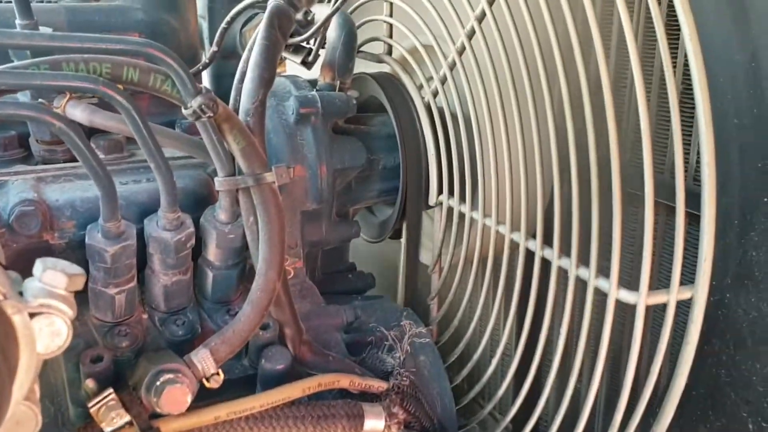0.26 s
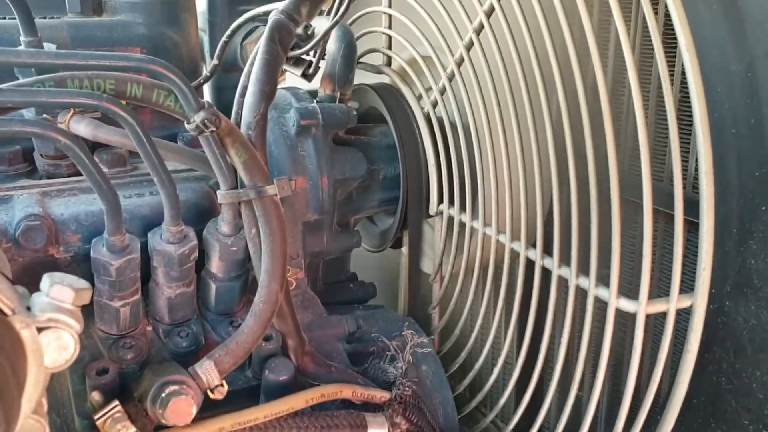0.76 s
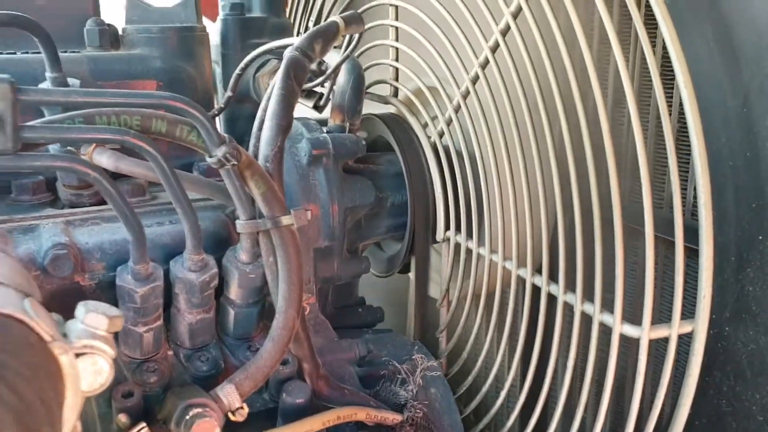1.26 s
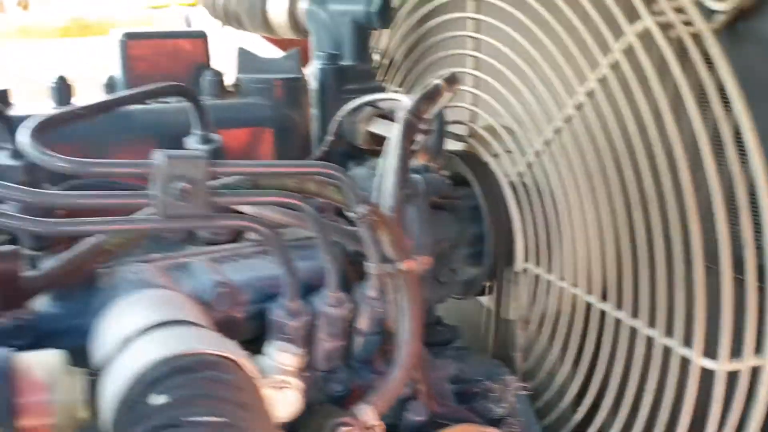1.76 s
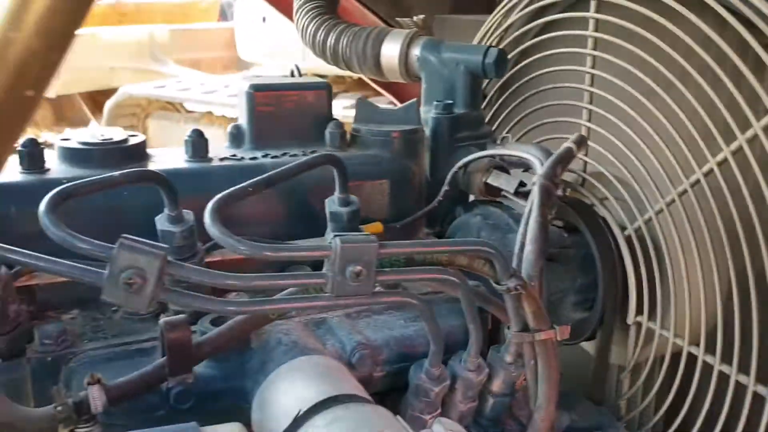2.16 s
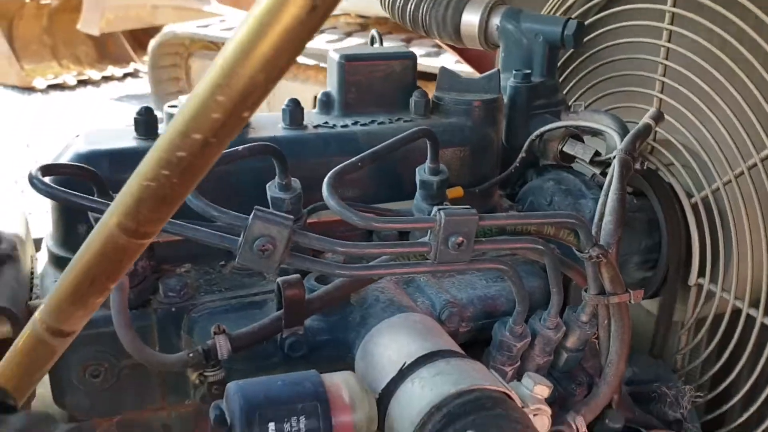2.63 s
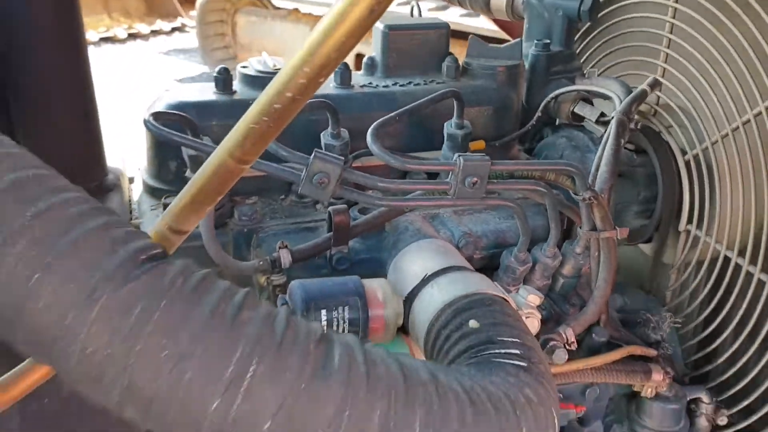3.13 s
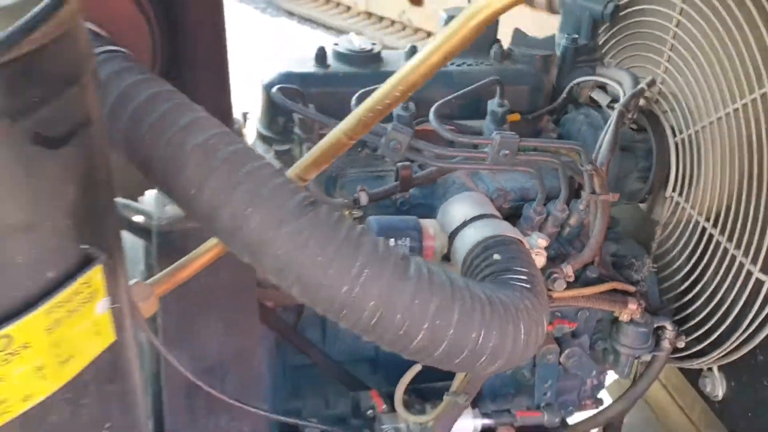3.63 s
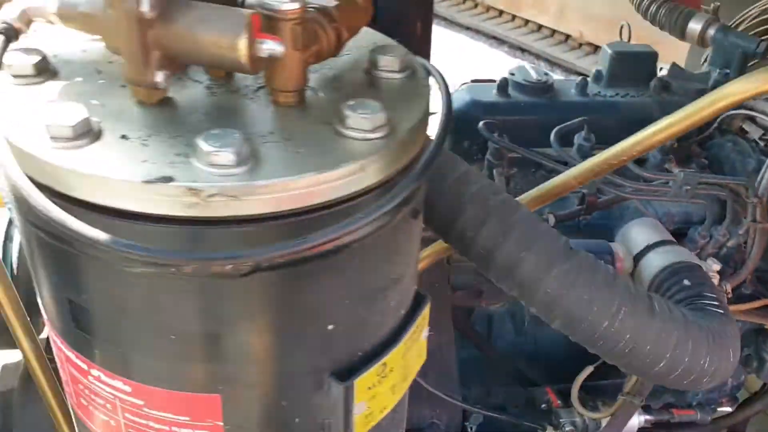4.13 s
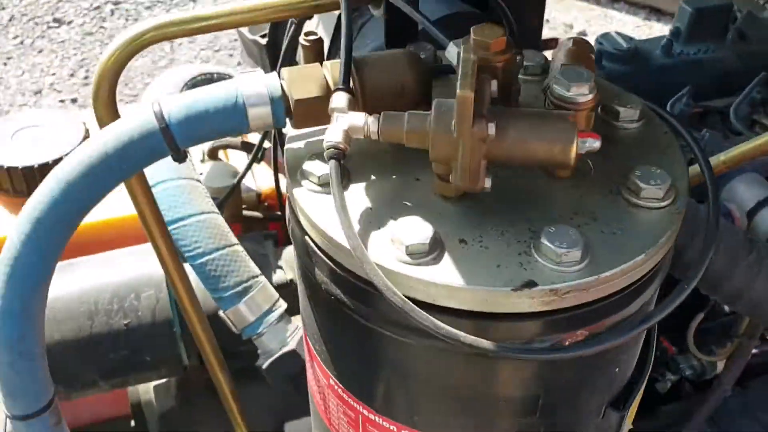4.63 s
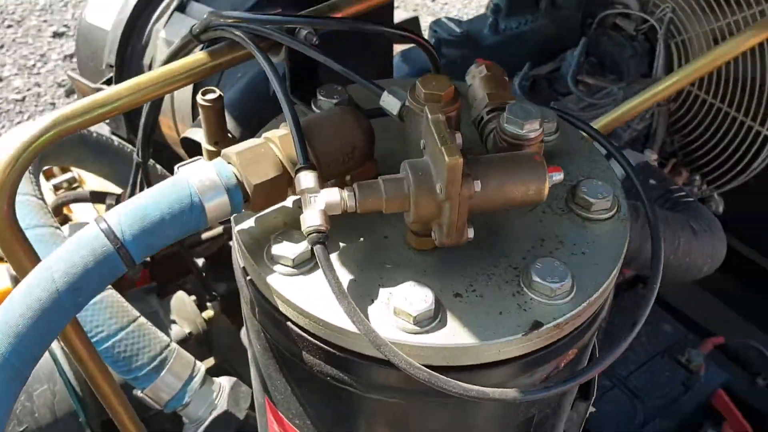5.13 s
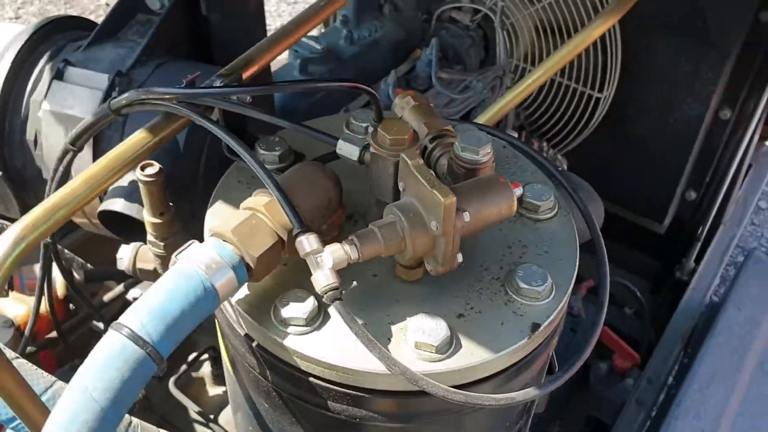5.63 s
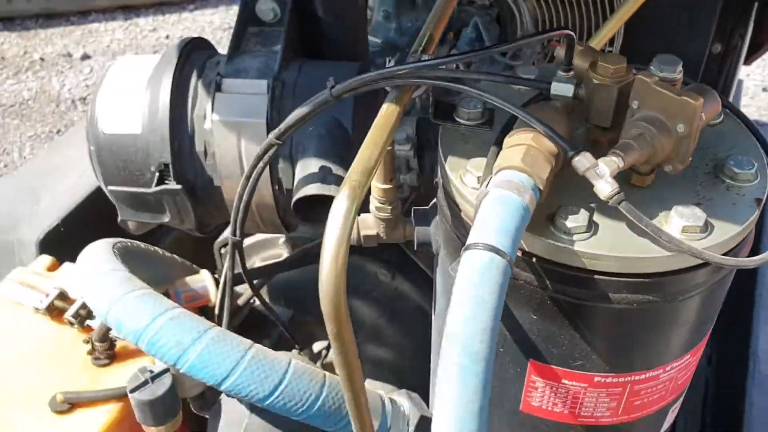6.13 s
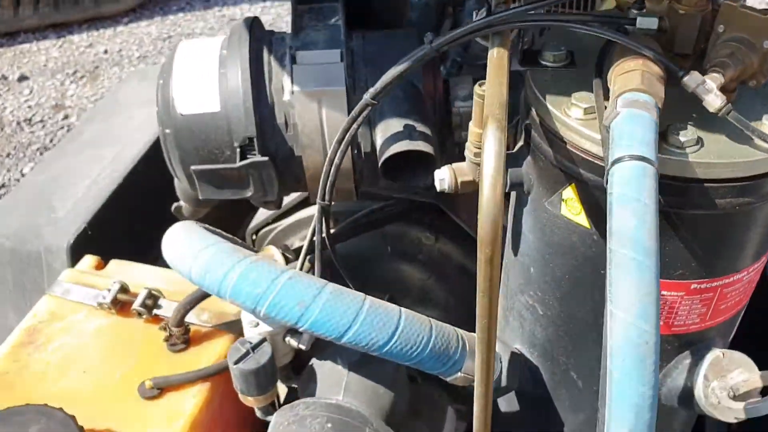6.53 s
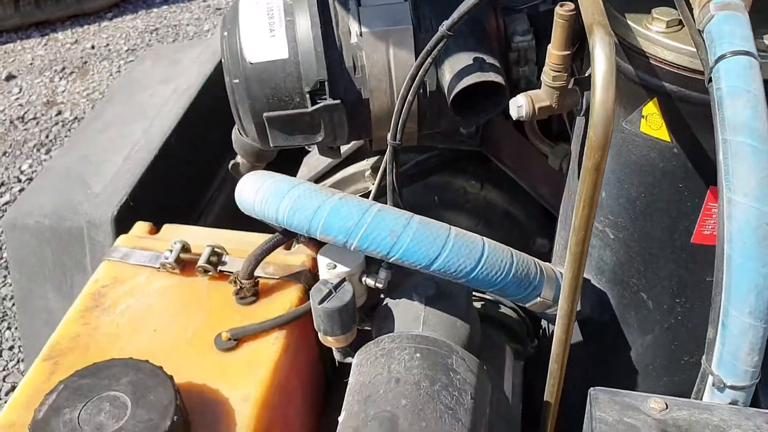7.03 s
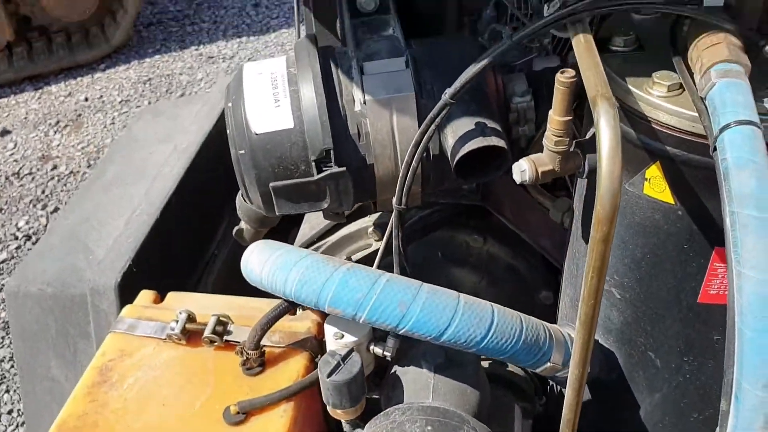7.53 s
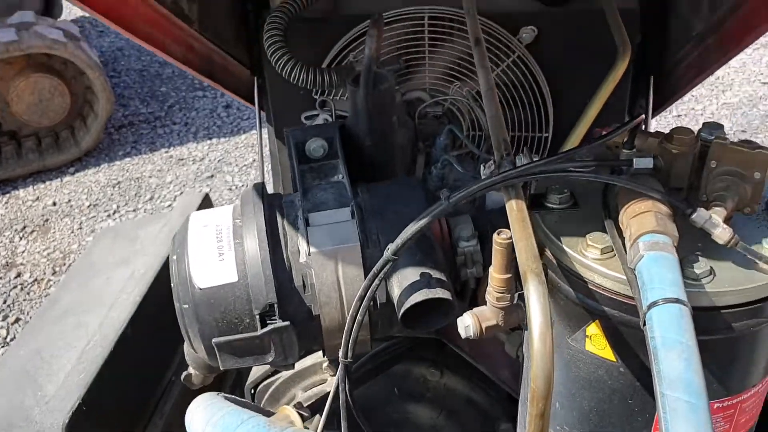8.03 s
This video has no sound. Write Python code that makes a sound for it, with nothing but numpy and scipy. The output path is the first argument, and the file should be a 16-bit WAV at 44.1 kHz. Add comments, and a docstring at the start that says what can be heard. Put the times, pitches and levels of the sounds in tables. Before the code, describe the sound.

A small diesel engine runs at steady speed with deep thumping exhaust, clatter and rushing air, dulling midway and then returning brighter.

```python
"""Portable air compressor, hood open

Three-cylinder diesel at governed speed: noise roar, repeating clatter, ringing knocks, tonal exhaust.
Belt-driven fan: phase-locked blade tones. Rushing air: two bands of shaped stereo noise.
A hand-held camera with two ports moves from the fan guard, behind the separator tank (shielded, quieter),
to the air filter; levels, port delay and colour follow it.
"""
import sys
import numpy as np
from scipy import signal
from scipy.fft import rfft, irfft, next_fast_len
from scipy.io import wavfile
from scipy.ndimage import uniform_filter1d, map_coordinates

SR = 44100
rng = np.random.default_rng(int(sys.argv[2]) if len(sys.argv) > 2 else 0)


def generate_wav(sig):
    """Save sig (samples, or channels by samples) to the path in sys.argv[1] as 16-bit PCM at SR."""
    pcm = np.round(np.clip(np.atleast_2d(sig).T, -1, 1) * 32767).astype(np.int16)
    wavfile.write(sys.argv[1], SR, pcm)


N = 365148
T = np.arange(N) / SR


def amp(db):
    """Decibels to gain."""
    return 10 ** (np.asarray(db) / 20)


def unit(x):
    """Scale to rms 1."""
    return x / np.sqrt(np.mean(x ** 2) + 1e-20)


def along(points, hz):
    """Interpolate (f/Hz, value) points on a log-frequency axis."""
    f, v = np.transpose(points)
    return np.interp(np.log(hz + 1), np.log(f + 1), v)


def curves(rows, t=T):
    """Each column after the time, read at the times t."""
    s, *cols = np.transpose(rows)
    return [np.interp(t, s, c) for c in cols]


def wobble(rate_hz):
    """Smooth random curve, rate_hz knots per second."""
    knots = rng.standard_normal(int(N * rate_hz / SR) + 4)
    return map_coordinates(knots, [T * rate_hz], order=2)


def bell(x, centre, half_width):
    """Smooth hump, 1 at the centre."""
    return np.exp(-((x - centre) / half_width) ** 2)


def filtered(x, response):
    """x times a response of frequency, by FFT."""
    m = next_fast_len(N + SR // 4)
    spectrum = rfft(x, m) * response(np.fft.rfftfreq(m, 1 / SR))
    return irfft(spectrum, m)[..., :N]


def panned(db):
    """Left and right gains of constant power for an L-R difference in dB."""
    gains = amp(np.array([db, -db]) / 2)
    return (gains / np.sqrt(np.mean(gains ** 2, axis=0))).reshape(2, -1)


WALK_START_S, WALK_S = 3.03, 2.5


def across(t=T):
    """Camera's place: 0 on the fan side, 1 on the filter side."""
    return np.clip((t - WALK_START_S) / WALK_S, 0, 1)


GUARD_LEFT_S, GUARD_LEAVING_S = 2.37, 0.47


def at_guard():
    """1 while the camera is at the fan guard, 0 once it has left."""
    return np.clip((GUARD_LEFT_S - T) / GUARD_LEAVING_S, 0, 1)


MIDWAY_S, MIDWAY_HALF_S = 5.38, 0.93


def midway(t=T):
    """Flat-topped hump: 1 around MIDWAY_S, 0 well away from it."""
    return np.exp(-np.square(((t - MIDWAY_S) / MIDWAY_HALF_S) ** 2))


# Relative colours by stretch of the walk; columns of each: f/Hz, half-width/Hz, left/dB, right/dB
# Right port turned away
SHADOW_COLOUR = [(2950, 670, 1, -9.5), (6630, 910, 3, 11.5), (9540, 1500, 2.5, -12.5)]
# Close behind the tank
TANK_COLOUR = [(8000, 470, -11, 9), (10300, 780, 2, -6), (11300, 700, 6.5, -6), (13900, 1600, -2, 5)]
# Mid-passage, around 5.4 s: narrow dips and humps, duller at the top
MIDWAY_COLOUR = [(2500, 400, -0.5, -6.5), (5960, 590, -1, -10), (7840, 420, -6, 15), (8930, 210, -9, -15),
                 (10380, 1140, 3.5, 6), (14700, 1200, -5, -3)]
# In the lee of the tank, which stands between camera and engine
SHIELD_COLOUR = [(287, 50, -7, -5), (640, 110, -3, -2.5), (1080, 120, -2, -4), (2900, 880, -2, 0)]
# Filter side
FILTER_COLOUR = [(2050, 94, -4, 3), (2720, 550, 1.5, -3.5), (6700, 500, -1, 0), (12260, 1300, 1.5, 5)]
# In under the hood
HOOD_COLOUR = [(1950, 240, 4, 8), (10200, 1000, 4.5, 10), (14200, 1800, -6, -1)]
TANK_S, TANK_HALF_S = 4.01, 0.31
SHIELD_S, SHIELD_HALF_S = 3.8, 1.6
HOOD_S, HOOD_HALF_S = 8.36, 0.69
PAST_TANK_S = 0.8  # fade-in of the filter side's colour, centred on MIDWAY_S
SHADOW_FULL_DB = 10  # mean L-R of air and engine at full shadow
AIR_USUAL_DB = -19.5  # sizzle level at which the jet band adds nothing
JET_HZ, JET_WIDTH_HZ = 10140, 2000
JET_GROWTH_DB_PER_DB = 0.4  # extra swell of the jet band with the air


def shading(f, t):
    """Relative dB per port over frequency and time: each colour fades in and out in its turn."""
    air_db, air_pan_db = curves(AIR_SIZZLE, t)
    machine_pan_db = curves(MACHINE_EXPOSURE, t)[1]
    shadow = np.clip((air_pan_db + machine_pan_db) / 2 / SHADOW_FULL_DB, 0, 1)
    past_tank = np.clip((t - MIDWAY_S) / PAST_TANK_S + 0.5, 0, 1)
    total = JET_GROWTH_DB_PER_DB * (air_db - AIR_USUAL_DB) * bell(f, JET_HZ, JET_WIDTH_HZ)
    colours = [
        (SHADOW_COLOUR, shadow),
        (TANK_COLOUR, bell(t, TANK_S, TANK_HALF_S)),
        (MIDWAY_COLOUR, midway(t)),
        (SHIELD_COLOUR, bell(t, SHIELD_S, SHIELD_HALF_S)),
        (FILTER_COLOUR, past_tank),
        (HOOD_COLOUR, bell(t, HOOD_S, HOOD_HALF_S)),
    ]
    for bands, amount in colours:
        for hz, half_width_hz, *ports_db in bands:
            total = total + amount * np.multiply.outer(ports_db, bell(f, hz, half_width_hz))
    return total


ECHO_PATH_MS = 1.5  # typical extra path of the reflections under the hood


def reflections(f, lead_ms, patchy_db=2.5):
    """Random narrow peaks and dips in dB, for echoes under the hood; they sweep in pitch with the lead."""
    field = rng.standard_normal((2, 2 * len(f), len(lead_ms)))
    field = uniform_filter1d(field, size=3, axis=1)
    field = uniform_filter1d(field, size=40, axis=2)
    stretch = 1 + lead_ms / ECHO_PATH_MS
    rows = np.clip(np.arange(len(f))[:, None] * stretch, 0, 2 * len(f) - 1).astype(int)
    patches = unit(field[:, rows, np.arange(len(lead_ms))])
    return patchy_db * patches * np.minimum(f / 2000, 1)  # weaker below 2 kHz


# Port delay as the camera turns from the fan, on its left, to face the machine: t/s, left lead/ms
PORT_LEAD = [(0, .44), (1.5, .44), (2.4, .452), (2.95, .447), (3.2, .41), (3.6, .23), (4.1, .08),
             (4.4, -.02), (4.7, -.05), (5.2, -.01), (5.52, .035), (5.98, -.04), (6.3, -.08), (7.25, -.15),
             (8.28, -.09)]
# Left-right likeness before scatter: f/Hz, likeness/1
LIKENESS = [(60, 0.87), (130, 0.64), (290, 0.64), (640, 0.73), (1400, 0.22), (3000, 0.07), (5000, 0.23),
            (6500, 0.55), (9000, 0.2), (12500, 0.65), (15500, 0.5)]
SCATTER, SCATTER_HZ = 0.56, 3000  # share of likeness lost round the tank, above this frequency


def heard(pair, colour, bearing):
    """Two unrelated signals made partly alike, delayed and coloured by nearby metal; rms 1.

    bearing: share of the port delay, smaller for a source more straight ahead.
    """
    hz, t, (a, b) = signal.stft(pair, SR, nperseg=1024)
    f, lead_ms = hz[:, None], curves(PORT_LEAD, t)[0]
    alike = along(LIKENESS, f) * (1 - SCATTER * across(t) * (f > SCATTER_HZ))
    turn = np.arccos(np.clip(alike, -1, 1)) / 2
    shared, apart = np.cos(turn) * a, np.sin(turn) * b
    rad_per_ms = 2 * np.pi * f / 1000
    delay = np.exp(-1j * rad_per_ms * bearing * lead_ms)
    ports = np.array([shared + apart, (shared - apart) * delay])
    gain = amp(along(colour, f) + shading(f, t) + reflections(f, lead_ms))
    gain /= np.sqrt(np.mean(gain ** 2, axis=1, keepdims=True))  # colour only: equal power per frame
    return unit(signal.istft(ports * gain, SR, nperseg=1024)[1][:, :N])


def at_ports(phase, hz, spread_rad):
    """Tone at two ports: phase apart by the delay, plus drift for standing waves under the hood."""
    apart = np.pi * hz * curves(PORT_LEAD)[0] / 1000
    apart = apart + spread_rad * wobble(0.74)
    return np.sqrt(2) * np.cos([phase + apart, phase - apart])


def rush(colour, bearing):
    """Turbulent air as coloured stereo noise."""
    return heard(rng.standard_normal((2, N)), colour, bearing)


def lines(table, turns, waver_db, spread_rad):
    """Harmonics of a rotation; balance shifts from the fan side to the filter side."""
    place, out = across(), np.zeros((2, N))
    for multiple, fan_db, filter_db in table:
        level = amp(fan_db + place * (filter_db - fan_db) + waver_db * wobble(5))
        phase = 2 * np.pi * (np.round(multiple) * turns + rng.random())
        apart = spread_rad * wobble(1.21)
        out += np.sqrt(2) * level * np.cos([phase + apart, phase - apart])
    return out


def low_level(fan_db, filter_db, follows):
    """dB of a low sound: own level on each side, following the firing note's rise and fall."""
    firing_db = curves(FIRING_NOTE)[0]
    return fan_db + across() * (filter_db - fan_db) + follows * (firing_db - firing_db.mean())


# Broad hiss, which bends further round obstacles: t/s, level/dB before offset, L-R/dB
AIR_HISS = [(0, -25.5, 1.5), (2, -26, 2), (3.2, -29, 9.5), (3.6, -31, 6), (4.3, -34.5, 7.5),
            (5.2, -31.5, 5), (5.75, -26, 6.5), (6.4, -28.5, 2.5), (7.3, -30.5, 2), (8.28, -27.5, 2)]
# Fine sizzle of the rushing air: t/s, level/dB before offset, L-R/dB
AIR_SIZZLE = [(0, -20, 4.5), (1.3, -19.9, 5), (2, -18, 10), (2.9, -18, 6.5), (3.25, -24, 7.5),
              (3.5, -24, 12), (3.75, -24.5, 11), (4.05, -24.5, 1), (4.3, -22.5, 0), (4.39, -26, 2.5),
              (4.5, -20.5, -3), (4.62, -24, 3), (4.95, -23, 0.5), (5.5, -21.5, 1), (5.76, -17.5, -1),
              (5.98, -19, 1), (6.35, -18, -4), (7.2, -23, -2.5), (7.9, -22.5, 1.5), (8.28, -19.5, 2)]
# Relative spectra: f/Hz, density/dB per Hz
HISS_SPECTRUM = [(1500, -25.5), (2700, -8.5), (4000, -3), (5400, -1), (6100, 0), (6700, -1), (7400, -2),
                 (8200, -8), (9200, -6), (12000, -30)]
SIZZLE_SPECTRUM = [(6000, -62), (8400, -20.5), (9500, -9), (10500, -3.5), (11400, 0.5), (12600, 1.5),
                   (14000, 1.5), (15800, -0.5)]
FLUTTER_DB = 0.3


def air():
    """Rushing air: turbulent broad hiss and finer sizzle, each fluttering and shaded per port."""
    hiss_db, hiss_pan_db = curves(AIR_HISS)
    sizzle_db, sizzle_pan_db = curves(AIR_SIZZLE)
    broad, fine = rush(HISS_SPECTRUM, bearing=1), rush(SIZZLE_SPECTRUM, bearing=1)
    hiss = amp(hiss_db + 1.06 + FLUTTER_DB * wobble(16)) * panned(hiss_pan_db) * broad
    sizzle = amp(sizzle_db + 1.5 + FLUTTER_DB * wobble(13)) * panned(sizzle_pan_db) * fine
    return hiss + sizzle


# Relative spectrum: f/Hz, density/dB per Hz
RUMBLE_SPECTRUM = [(8, -28), (30, -6), (60, -.5), (110, -2), (200, -3.5), (300, -13), (500, -28)]
SWELL_S, SWELL_HALF_S, SWELL_DB = 5.1, 0.36, 5  # brief swell above the tank
CHUG_DB = 1.3  # swing either way with each firing


def rumble(cycles):
    """Low turbulence around engine and fan shroud, chugging at the firing rate."""
    swell_db = SWELL_DB * bell(T, SWELL_S, SWELL_HALF_S)
    chug_db = CHUG_DB * np.cos(6 * np.pi * cycles)
    level_db = low_level(fan_db=-37.0, filter_db=-39.3, follows=1.12) + swell_db + wobble(9) + chug_db
    return amp(level_db) * rush(RUMBLE_SPECTRUM, bearing=0.91) * panned(3.3)


GUARD_DB = 6.5  # blade note's gain at the guard


def blade_note(passes):
    """Blades sweep past the guard; uneven inflow wavers the note, which beats with engine order 13."""
    level_db = low_level(fan_db=-38.5, filter_db=-42.0, follows=0.92) + GUARD_DB * at_guard()
    note = at_ports(2 * np.pi * passes + 0.09 * wobble(21), hz=224, spread_rad=0.1)
    return amp(level_db + 0.71 * wobble(16)) * note * panned(1.4)


# Blade overtones, relative levels: multiple of blade rate/1, fan side/dB, filter side/dB
BLADE_OVERTONES = [(2, -47, -42), (3, -46, -53), (4, -48, -45.5), (6, -57, -46)]
OVERTONE_GUARD_DB = 4  # gain close to the guard
BLADE_JITTER_PASSES = 0.048


def whine(passes):
    """Blade-rate harmonics, blurred by uneven inflow."""
    blurred = passes + BLADE_JITTER_PASSES * wobble(18)
    gain = amp(0.9 + OVERTONE_GUARD_DB * at_guard())
    return gain * lines(BLADE_OVERTONES, blurred, waver_db=3.0, spread_rad=0.44)


# Weaker engine lines, relative levels: multiple of cycle rate/1 (rounded in use), fan side/dB, filter side/dB
ENGINE_ORDERS = [(7, -48, -49), (8, -50, -60), (10, -47, -52), (11, -56, -46), (13, -45.5, -39.5),
                 (14, -52, -50), (16, -57, -50), (19, -46.5, -50.5), (20, -50, -48), (22, -47.5, -49.5),
                 (23, -57, -53), (26, -57, -50.5), (30, -65, -49), (34, -68, -51), (39, -58, -48),
                 (43, -57, -47), (56, -55, -49.5), (65.8, -48.5, -46.5), (90.6, -46.5, -51),
                 (111, -47.5, -52)]
FRAY_CYCLES = 0.0025


def drone(cycles):
    """Harmonics of the engine cycle; uneven crank turning frays the higher ones."""
    frayed = cycles + FRAY_CYCLES * wobble(30)
    return amp(2.5) * lines(ENGINE_ORDERS, frayed, waver_db=1.5, spread_rad=0.54)


# Relative spectrum: f/Hz, density/dB per Hz
ROAR_SPECTRUM = [(90, -22), (170, -1.5), (250, 7), (320, -0.5), (520, 1), (640, -1), (1050, -0.5),
                 (1400, -1), (2000, -3), (3000, -3), (4500, -15), (9000, -59)]
LOPE_DB = 0.3  # swing either way once a cycle


def roar(cycles):
    """Engine noise, loping once a cycle as the cylinders pull unequally."""
    lope_db = LOPE_DB * np.cos(2 * np.pi * (cycles - 0.85))
    throb = amp(lope_db + 0.78 * wobble(30))
    return amp(-27.5) * throb * rush(ROAR_SPECTRUM, bearing=0.41)


# Relative spectrum: f/Hz, density/dB per Hz
BLOCK_SPECTRUM = [(120, -49), (250, -6), (450, 4.5), (650, -5), (1000, 4), (1300, -13), (1900, 2),
                  (2400, -6), (4000, 0), (8000, -52)]


def block(cycles):
    """Valves, gears, pistons: noise patterns repeat every cycle, in a slowly drifting blend of four."""
    size = 2500  # pattern samples per cycle
    at = (cycles % 1 * size).astype(int)
    weights = np.array([wobble(0.59) for _ in range(4)])
    weights = unit(weights / np.linalg.norm(weights, axis=0))
    patterns = rng.standard_normal((4, 2, size))
    clatter = np.sum(weights[:, None] * patterns[..., at], axis=0)
    firing = amp(np.cos(6 * np.pi * (cycles - 0.2)))  # +-1 dB at the firing rate
    return heard(clatter * firing, BLOCK_SPECTRUM, bearing=0.23)


# Blows in one cycle, one cylinder knocking hardest; relative levels:
# crank angle/cycle, ring f/Hz, width/Hz, fan side/dB, filter side/dB
CASING_BLOWS = [(.18, 1900, 800, -48, -42), (.485, 1950, 900, -40.5, -40.5), (.53, 2000, 700, -46, -43),
                (.82, 2000, 800, -44, -43), (.28, 560, 600, -44, -42.5), (.55, 950, 1000, -47, -44),
                (.74, 700, 700, -50, -43), (.86, 800, 1000, -41, -42), (.96, 330, 600, -43, -46),
                (.32, 3800, 2600, -42, -51), (.65, 3800, 2600, -43, -49)]


def knocks(cycles, t60_s, loose, scatter_db):
    """Combustion and valve blows at fixed crank angles: decaying noise rings casing resonances."""
    t = np.arange(SR // 25) / SR
    place, out = across(), np.zeros((2, N + SR // 25))
    swell = (1 - np.exp(-t / 0.0011)) * amp(-60 * t / t60_s)
    for angle, ring_hz, width_hz, fan_db, filter_db in CASING_BLOWS:
        starts = np.flatnonzero(np.diff(np.floor(cycles - angle)))
        common = rng.standard_normal((2, len(t)))
        rattle = loose * rng.standard_normal((len(starts), 2, len(t)))  # new at each blow
        b, a = signal.iirpeak(ring_hz, ring_hz / width_hz, SR)
        rings = signal.lfilter(b, a, (common + rattle) * swell)
        rings = signal.lfilter(b, a, rings)
        rings = unit(rings + 0.15 * rings[:, ::-1])  # crosstalk between ports
        levels_db = fan_db + place[starts] * (filter_db - fan_db)
        levels = amp(levels_db + scatter_db * rng.standard_normal(len(starts)))
        for start, level, ring in zip(starts, levels, rings):
            out[:, start:start + len(t)] += level * ring
    return out[:, :N]


# Firing note, which all the low sounds follow: t/s, level/dB before offset
FIRING_NOTE = [(0, -27), (1.3, -26), (2.3, -32.5), (3, -36), (4.5, -36), (4.9, -32), (5.3, -33.7),
               (5.9, -26.5), (7.4, -25.5), (8.28, -23.7)]
# Harmonics sharpening each puff, relative levels: multiple of firing rate/1, fan side/dB, filter side/dB
PUFF_HARMONICS = [(3, -42.5, -36.8), (4, -42, -49), (5, -48.5, -46)]


def exhaust(cycles):
    """Three firings a cycle: deep note whose harmonics crest together, sharpening puffs into thumps."""
    firing_db = curves(FIRING_NOTE)[0]
    phase = 2 * np.pi * 3 * cycles
    puffs = at_ports(phase, hz=53, spread_rad=0.16)
    puffs = puffs + amp(-24) * at_ports(2 * phase, hz=106, spread_rad=0.18)
    edge = 0
    for multiple, fan_db, filter_db in PUFF_HARMONICS:
        level_db = low_level(fan_db, filter_db, follows=0.77) + wobble(12) / 2
        harmonic = at_ports(multiple * phase + 0.09 * wobble(5), hz=53 * multiple, spread_rad=0.25)
        edge = edge + amp(level_db) * harmonic
    unsteady_db = 0.42 * wobble(20)
    return (amp(firing_db - 0.9 + unsteady_db) * puffs + edge) * panned(2.8)


# Governed speed, held within half a percent: t/s, mean four-stroke cycle rate f/Hz
GOVERNED_SPEED = [(0, 17.664), (1, 17.712), (2.4, 17.645), (4.8, 17.644), (5.4, 17.703), (7, 17.745),
                  (8.28, 17.73)]
# How openly the engine block is heard: t/s, level/dB before offset, L-R/dB
MACHINE_EXPOSURE = [(0, -28, 6), (1.4, -29, 5.5), (2.1, -30.5, 7.5), (3, -34.0, 11.5), (3.7, -41, 5),
                    (4.3, -38, 12), (4.8, -38, 3), (5.4, -37, 4.5), (6.05, -30.0, 2.5), (7.2, -30.5, 1),
                    (8.28, -28.5, 0.5)]


def scene():
    """One shaft drives engine and fan; roar, clatter and overtones fade together behind the tank."""
    cycles = np.cumsum(curves(GOVERNED_SPEED)[0] * (1 + 0.0007 * wobble(15))) / SR
    passes = 12.872 * cycles  # blade passes per engine cycle
    machine_db, pan_db = curves(MACHINE_EXPOSURE)
    exposure = amp(machine_db + 26.5 + 0.69 * wobble(22)) * panned(pan_db)
    fan_and_air = air() + rumble(cycles) + blade_note(passes)
    clatter = amp(-33.5) * block(cycles) + knocks(cycles, t60_s=0.015, loose=0.8, scatter_db=2.5)
    machine = whine(passes) + drone(cycles) + roar(cycles) + clatter
    return fan_and_air + exposure * machine + exhaust(cycles)


TOP_HZ = 15900


def record(dry):
    """Hard band limit: nothing at or above TOP_HZ is kept."""
    return filtered(dry, lambda hz: hz < TOP_HZ)


dry = scene()
out = record(dry)
generate_wav(out)
```